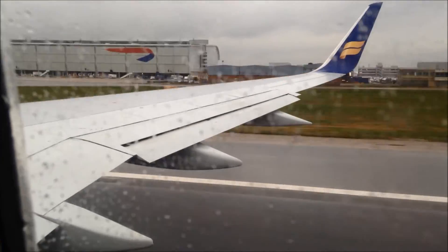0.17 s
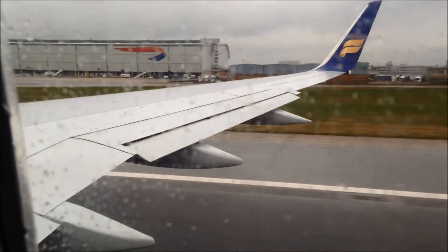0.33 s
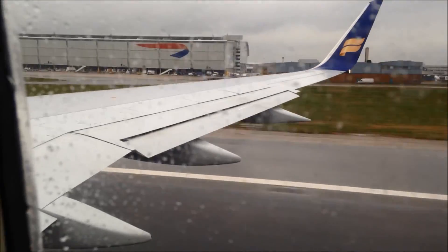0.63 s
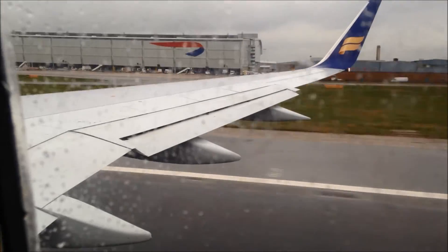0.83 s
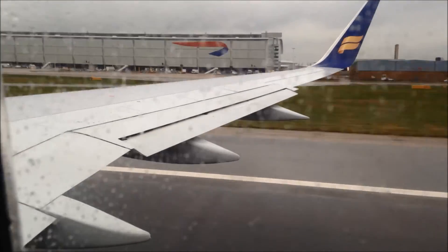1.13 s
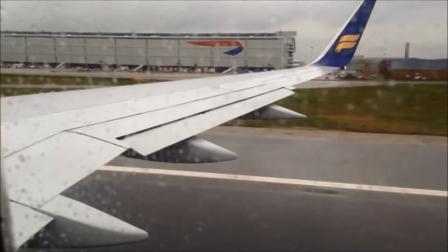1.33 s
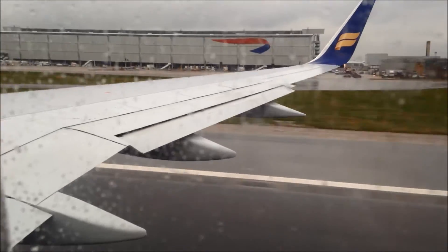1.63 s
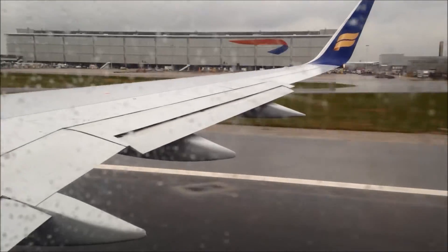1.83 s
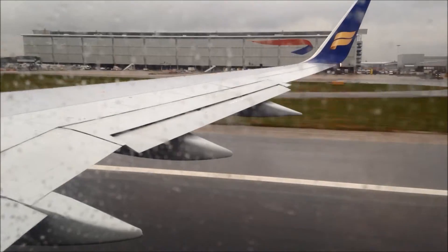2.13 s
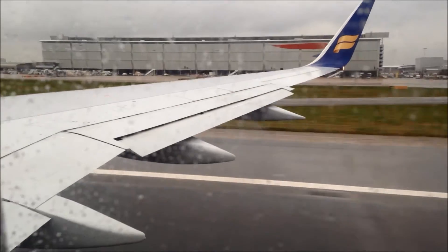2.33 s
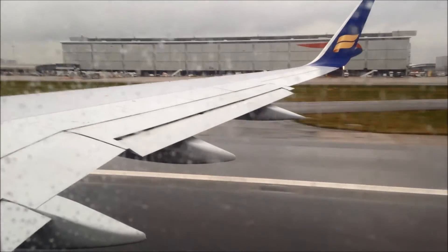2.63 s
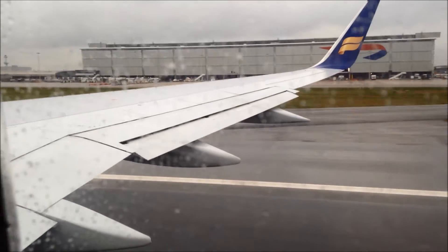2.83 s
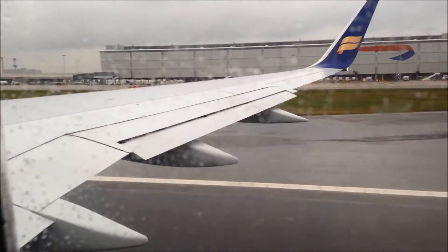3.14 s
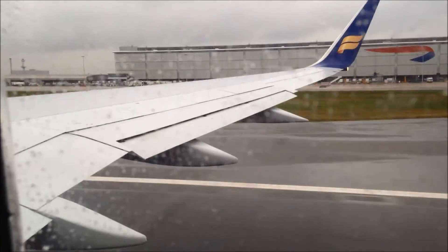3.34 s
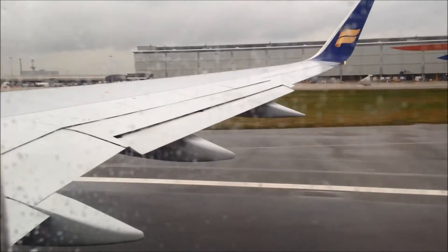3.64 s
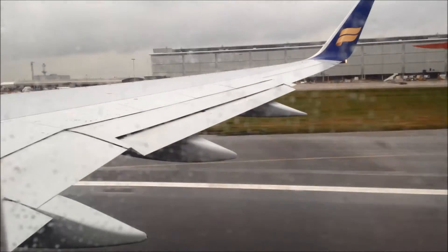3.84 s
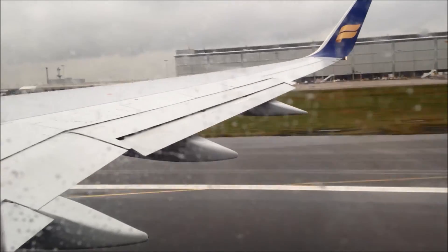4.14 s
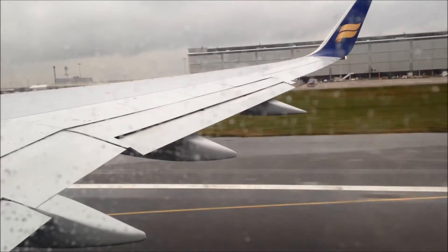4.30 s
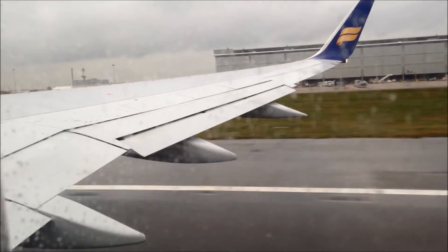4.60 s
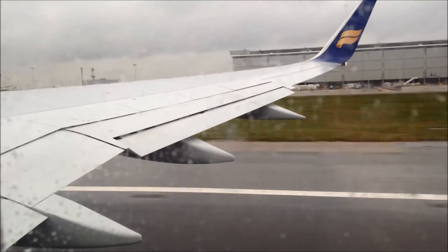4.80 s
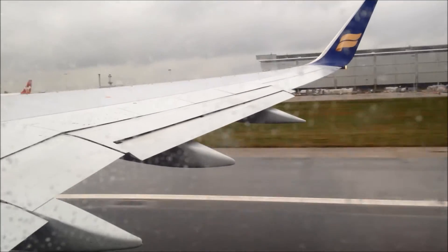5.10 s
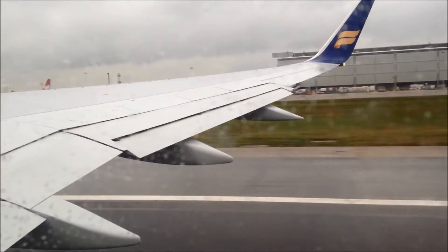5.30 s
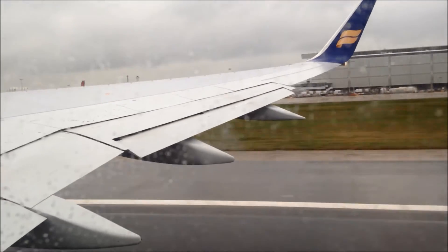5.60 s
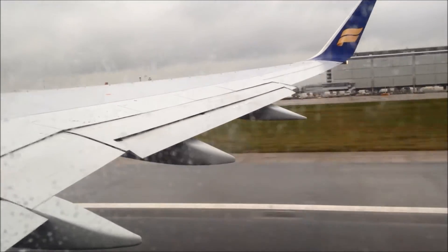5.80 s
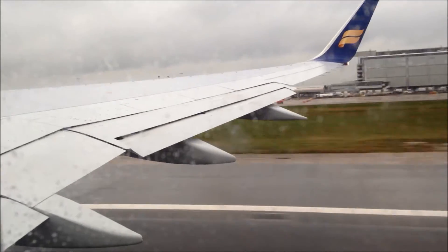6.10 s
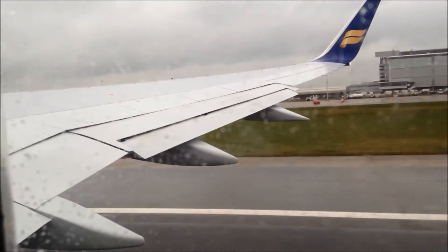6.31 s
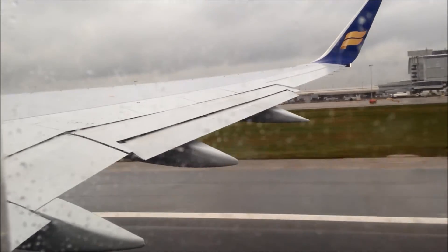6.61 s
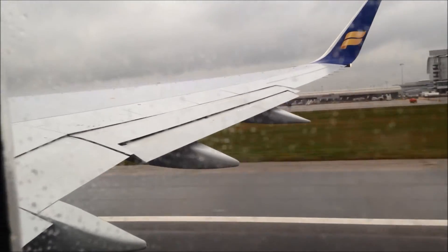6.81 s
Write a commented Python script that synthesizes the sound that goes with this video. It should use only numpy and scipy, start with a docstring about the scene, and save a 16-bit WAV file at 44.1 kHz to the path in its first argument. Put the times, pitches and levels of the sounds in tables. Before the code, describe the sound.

Inside an airliner cabin during the takeoff roll, close to a window. A loud, deep jet rumble booms through the hull from start to finish, surging slightly in its low registers. Above it sit a much quieter dull panel roar, faint noisy turbine whine and thin air hiss. Loose trim patters rapidly, with small knocks and brief buzzes growing more frequent in the second half. The microphone is inside, overloaded by bass, with peaks held down.

```python
"""Inside an airliner cabin on its takeoff roll: jet noise comes through the hull as a deep, booming rumble.
Wall panels add a duller roar of shaped noise, with narrow noise bands as their rings and the turbine whines.
Vents hiss, loose trim knocks in short runs of decaying tones, a panel buzzes briefly and noise bursts tick.
Most layers share a level that drops now and then; a fast limiter holds the loudest peaks at full scale."""
import sys
import numpy as np
from scipy import signal
from scipy.fft import rfft, irfft, next_fast_len
from scipy.io import wavfile
from scipy.ndimage import uniform_filter1d, minimum_filter1d, map_coordinates

SR = 44100
rng = np.random.default_rng(int(sys.argv[2]) if len(sys.argv) > 2 else 0)


def volts_from_decibels(level):
    """Turn decibel levels (scalar or array-like) into linear amplitude factors."""
    exponent = np.asarray(level, float) / 20
    return 10 ** exponent


def wav_record(signal):
    """Record a signal, one row per channel, as 16-bit PCM in the file named by sys.argv[1]."""
    frames = np.transpose(np.atleast_2d(signal))
    bounded = np.clip(frames, -1, 1)
    # unit amplitude maps onto the largest positive 16-bit level
    quanta = np.round(bounded * 32767).astype(np.int16)
    wavfile.write(sys.argv[1], SR, quanta)


N = 306495  # length in samples

# The level shared by most layers, which drops and creeps back. Each row: time in seconds, level in dB.
COMMON_LEVEL = [(0, -51), (.2, -52.8), (.78, -52), (.945, -54.5), (.96, -56), (1.3, -54.5), (1.95, -52.5),
                (2.42, -51.5), (2.55, -52), (2.58, -55), (3.05, -54), (3.22, -55), (3.6, -52.5),
                (3.63, -55), (4.18, -52.5), (4.42, -54.5), (4.61, -52), (4.68, -53.5), (4.96, -53),
                (5.06, -54.5), (5.5, -53), (6.18, -52.5), (6.27, -54.5), (6.6, -53), (6.72, -54),
                (6.95, -53)]

# How far the bass stands over the common level, before the register offsets.
# Each row: time in seconds, deep register in dB, boom and top registers in dB.
BASS_LEVEL = [(0, 35, 43), (.6, 35, 40), (1.2, 37.5, 41), (1.6, 39.5, 41.5), (2.1, 35.5, 39.5),
              (2.55, 35.5, 42), (3.1, 34.5, 41.5), (3.5, 38.5, 39.5), (3.8, 32, 40), (4.2, 36.5, 42),
              (4.7, 38, 39), (5.2, 36.5, 41), (5.6, 35, 41), (6.15, 37.5, 41.5), (6.45, 38, 41),
              (6.7, 41.5, 41), (6.95, 37, 41)]
# Colour of the jet noise through the hull. Each row: frequency in Hz, relative level in dB per Hz.
HULL_COLOUR = [(12, -36), (30, -30), (40, -18), (48, -4.5), (114, -2), (190, -1.5), (215, -7), (260, -9.5),
               (330, -8), (359, -14.5), (420, -14.5), (485, -29), (600, -34.5), (780, -67), (1320, -120)]
# Cabin booms beside the hull noise. Each row: centre in Hz, width in Hz, relative rms level in dB.
CABIN_BOOMS = [(156, 19, -17), (302.2, 20, -22)]
# The edges between the four bass registers, in Hz.
REGISTER_EDGES = 125, 240, 350
# Offset in dB of each register: deep, first boom, second boom, top.
REGISTER_OFFSETS = -1, -1.5, -6, -15
SURGE_DB, SURGES_PER_S = 1.8, 10  # size and pace of the random surges of each register

# Colour of the wall panels' roar. Each row: frequency in Hz, relative level in dB per Hz.
PANEL_COLOUR = [(260, -38.5), (450, -9), (491, -4), (562, -12.5), (649, -8), (963, -16), (1420, -20.5),
                (1890, -23.5), (2450, -20.5), (2830, -31), (3180, -24.5), (3370, -27), (4500, -34.5),
                (5850, -61), (9900, -120)]
# Narrow rings of the panels. Each row: centre in Hz, width in Hz, relative rms level in dB.
PANEL_RINGS = [(642, 37, -51), (770, 50, -56.5), (1102, 140, -56), (1375, 320, -52.5), (1602, 54, -64),
               (1735, 63, -59), (1860, 99, -61), (2096, 330, -55), (2474, 140, -58), (3143, 130, -62),
               (8170, 760, -67.5)]
# Turbine whines. Each row: centre in Hz, width in Hz, relative rms level in dB.
TURBINE_WHINES = [(1220, 9.8, -58), (1433, 13, -64), (3150, 30, -67)]

# Colour of the vent hiss. Each row: frequency in Hz, relative level in dB per Hz.
VENT_COLOUR = [(2060, -28), (3500, -4), (4080, -3), (4730, -4), (6740, -7), (8890, -7), (11600, -12),
               (12800, -15), (14400, -16.5), (15200, -21)]
# A thin band of hiss that comes and goes. Each row: time in seconds, level in dB before its ring and wobble.
THIN_HISS_LEVEL = [(0, -57), (.4, -62), (1.1, -60.5), (2.43, -50.5), (2.55, -58), (2.75, -51), (3.1, -65),
                   (4.7, -63), (5, -58.5), (6.2, -57), (6.95, -63)]
PANEL_DB, VENT_DB = 15, 3  # panel roar and vent hiss over the common level

# Louder knocks of loose trim. Each row: start in seconds, peak in dB before the lift all knocks get.
KNOCKS = [(0.6604, -37), (0.831, -37), (2.2488, -37), (2.5365, -33), (3.1103, -37), (4.0602, -34),
          (4.2188, -35.5), (4.2764, -32), (4.5216, -36), (4.7566, -34), (4.792, -35), (4.9651, -33.5),
          (5.373, -34), (5.45, -33), (5.8541, -34), (5.9035, -36), (6.0616, -35), (6.2477, -37),
          (6.351, -31), (6.4986, -38), (6.5191, -31), (6.541, -34), (6.6166, -34), (6.64, -32), (6.66, -30),
          (6.7665, -33)]
# Tones in one knock, before random spread. Each row: frequency in Hz, relative level in dB,
# time to fall by 60 dB in seconds.
TRIM_TONES = [(3400, -13.5, 0.01), (4014, 2, 0.012), (4600, -15, .007), (5260, -3, 0.0059)]
PATTER_DB = 7.5  # mean peak of the fine patter over the common level, before the lift all knocks get
RUNS_DB, RUNS_PER_S = 2.5, 4.4  # size and pace of the runs in the patter

# Brief panel buzzes. Each row: start in seconds, height of the swell in dB before the level of its ring.
BUZZES = [(1.2725, -45), (2.7911, -44), (4.554, -39), (4.8648, -39), (5.015, -42), (5.4505, -38),
          (5.5618, -40), (6.0701, -40)]
SMALL_BUZZ_DB, SMALL_BUZZ_COUNT = -42.5, 40  # mean swell height and number of buzzes at random moments

# Bright ticks close by. Each row: start in seconds, rms level at the start in dB.
TICK_TIMES = [(4.79, -50), (5.8156, -40.5)]
# Colour of a tick. Each row: frequency in Hz, relative level in dB.
TICK_COLOUR = [(3000, -32), (4500, -3), (6000, 4), (9000, -4.5), (13000, 1), (15000, -5), (16000, -40)]


def unit(x):
    """Scale a sound to an rms of 1."""
    return x / np.sqrt(np.mean(x ** 2) + 1e-20)


def along(points, hz):
    """Read a curve of (Hz, value) points on a logarithmic frequency axis."""
    f, v = np.transpose(points)
    return np.interp(np.log(hz + 1), np.log(f + 1), v)


def curves(rows):
    """Draw one smooth line, a value per sample, for each column after the time."""
    times, *columns = np.transpose(rows)
    return [np.interp(np.arange(N) / SR, times, column) for column in columns]


def common_level():
    """The shared level in dB at every sample."""
    return curves(COMMON_LEVEL)[0]


def wobble(rate):
    """A smooth random curve through `rate` random points a second (40 at most)."""
    points = rng.standard_normal(int(N * 40 / SR) + 4)
    return map_coordinates(points, [np.arange(N) * rate / SR])


def filtered(x, response):
    """Multiply the spectrum of x by a response that depends on frequency."""
    size = next_fast_len(N + SR // 2)  # spare room, so the end does not wrap onto the start
    spectrum = rfft(x, size) * response(np.fft.rfftfreq(size, 1 / SR))
    return irfft(spectrum, size)[:N]


def noise(response):
    """Fresh random noise of rms 1, coloured by a frequency response."""
    return unit(filtered(rng.standard_normal(N), response))


def ringing(modes):
    """Noise through narrow resonances, each with its own centre, width and rms level."""
    total = 0
    for centre, width, db in modes:
        total = total + volts_from_decibels(db) * noise(
            lambda f: (f * width / np.hypot(centre * centre - f * f, f * width)) ** 2)
    return total


def patchy(x, depth_db, size):
    """Turbulence: random gain in patches of frequency and of time (size steps of about 6 ms)."""
    spectrum = signal.stft(x, nperseg=512)[2]
    field = uniform_filter1d(rng.standard_normal(spectrum.shape), size=6, axis=0)
    field = uniform_filter1d(field, size=size, axis=1)
    return signal.istft(spectrum * volts_from_decibels(depth_db * unit(field)), nperseg=512)[1][:N]


def rumble():
    """Jet noise through the hull with two cabin booms, split into registers that surge on their own."""
    body = volts_from_decibels(-11.0) * noise(lambda f: volts_from_decibels(along(HULL_COLOUR, f))) + ringing(CABIN_BOOMS)
    below = [filtered(body, lambda f: 1 / (1 + (f / edge) ** 10)) for edge in REGISTER_EDGES]
    # neighbouring lowpassed copies differ by one register
    registers = np.diff([0 * body, *below, body], axis=0)
    deep_db, booms_db = curves(BASS_LEVEL)
    columns = deep_db, booms_db, booms_db, booms_db
    total = 0
    for column, offset_db, register in zip(columns, REGISTER_OFFSETS, registers):
        # even out the level first, then let it surge
        power = np.abs(uniform_filter1d(register ** 2, size=7000))
        steady = register / np.sqrt(power + 1e-9)
        surge_db = SURGE_DB * wobble(SURGES_PER_S)
        total = total + volts_from_decibels(common_level() + column + offset_db + surge_db) * steady
    return total


def roar():
    """Wall panels shaken by the engines: broad noise, fluttering rings, and narrow noise as turbine whines."""
    broad = volts_from_decibels(-41.5) * noise(lambda f: volts_from_decibels(along(PANEL_COLOUR, f)))
    rings = patchy(ringing(PANEL_RINGS), depth_db=2.5, size=5)
    panels = patchy(broad, depth_db=1.0, size=12) + rings + ringing(TURBINE_WHINES)
    return volts_from_decibels(common_level() + PANEL_DB + 0.52 * wobble(12)) * unit(panels)


def vents():
    """Air hissing from the vents as slightly fluttering noise, with one thin unsteady band."""
    air = patchy(noise(lambda f: volts_from_decibels(along(VENT_COLOUR, f))), depth_db=1.0, size=12)
    thin_db = curves(THIN_HISS_LEVEL)[0] + 1.5 * wobble(8.2)
    thin_band = volts_from_decibels(thin_db) * ringing([(2820, 280, -1.2)])
    return volts_from_decibels(common_level() + VENT_DB + 0.55 * wobble(14)) * air + thin_band


def rattle():
    """Loose trim knocks as short decaying tones: louder ones, and an irregular patter near 90 a second in runs."""
    t = np.arange(SR // 20) / SR
    out = np.zeros(N + SR)
    beats = np.arange(0, N / SR, 1 / 90)
    luck = rng.standard_normal((len(beats), 2))
    runs_db = common_level() + RUNS_DB * wobble(RUNS_PER_S)
    beat_db = PATTER_DB + runs_db[(beats * SR).astype(int)]
    # each patter knock strays in time and in level
    patter = np.c_[np.abs(beats + .006 * luck[:, 0]), beat_db + 4 * luck[:, 1]]
    for start, db in np.vstack([KNOCKS, patter]):
        spread = rng.standard_normal((len(TRIM_TONES), 2))
        ring = 0
        for (hz, level, t60), (louder, higher) in zip(TRIM_TONES, spread):
            decay = volts_from_decibels(level + 2.5 * louder - 60 * t / t60)
            ring = ring + decay * np.sin(2 * np.pi * hz * (1 + .03 * higher) * t)
        # every knock is lifted by 2.5 dB
        out[round(start * SR):][:len(t)] += volts_from_decibels(db + 2.5) * ring / np.abs(ring).max()
    return out[:N]


def buzz():
    """A narrow panel ring, made of noise, swells for a few hundredths of a second at set and random moments."""
    t = np.arange(N) / SR
    luck = rng.random((SMALL_BUZZ_COUNT, 2))
    small = np.c_[luck[:, 0] * N / SR, SMALL_BUZZ_DB + 4 * (luck[:, 1] - .5)]
    swell = 0
    for start, db in np.vstack([BUZZES, small]):
        # a bell-shaped swell, highest 15 ms after its start
        swell = swell + volts_from_decibels(db) * np.exp(-((t - start - .015) / 0.0094) ** 2)
    return swell * ringing([(2534, 180, -6.0)])


def ticks():
    """Each tick is a bright burst of noise that dies within a few hundredths of a second."""
    t = np.arange(N) / SR
    shape = 0
    for start, db in TICK_TIMES:
        # falls by 60 dB in 0.05 s
        shape = shape + volts_from_decibels(db - 60 * np.clip(t - start, 0, 1) / .05) * (t > start)
    return shape * noise(lambda f: volts_from_decibels(along(TICK_COLOUR, f)))


def scene():
    """Everything heard at the window seat, as one channel."""
    mix = rumble() + roar() + vents() + rattle() + buzz() + ticks()
    return mix[None]


def band_limit(x):
    """A steep low-pass at the top of the band."""
    return signal.sosfilt(signal.butter(12, 15300, fs=SR, output="sos"), x)


def record(dry):
    """A fast limiter turns the sound down around each peak that would pass full scale."""
    need = np.minimum(1, 1 / (np.abs(dry) + 1e-9))
    # hold the lowest gain for 10 ms, then smooth it over 7 ms
    gain = uniform_filter1d(minimum_filter1d(need, size=441), size=301)
    limited = dry * gain
    return band_limit(limited)


dry = scene()
out = record(dry)
wav_record(out)
```